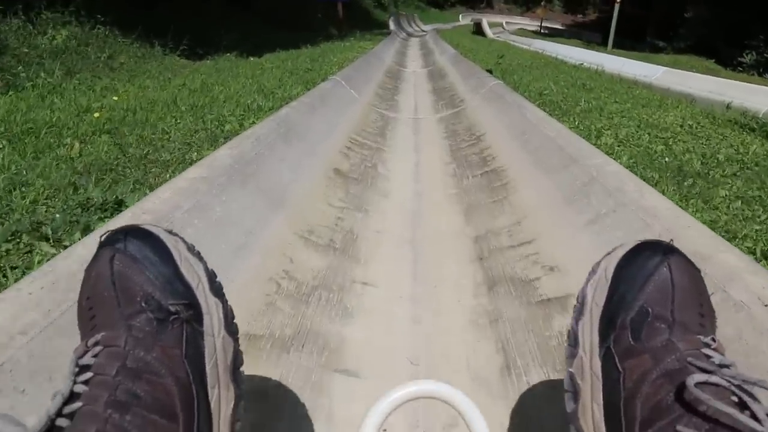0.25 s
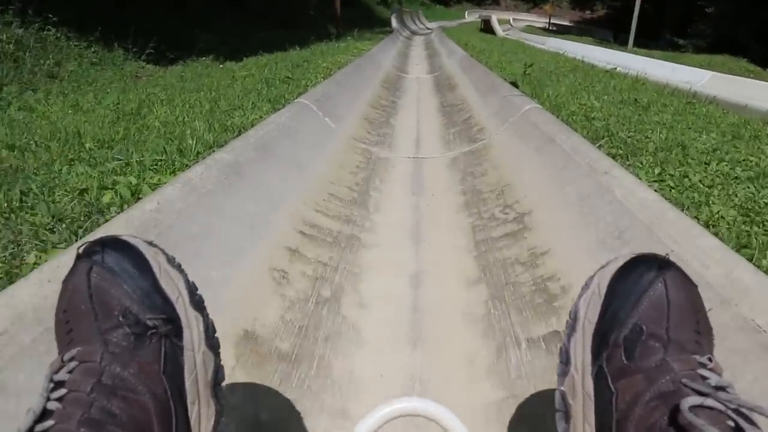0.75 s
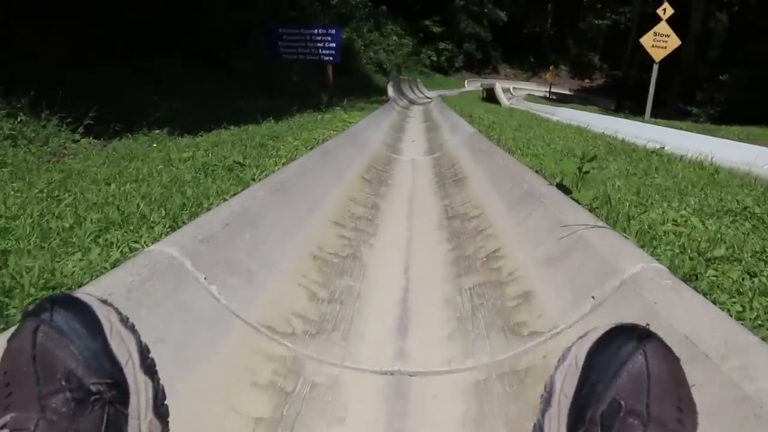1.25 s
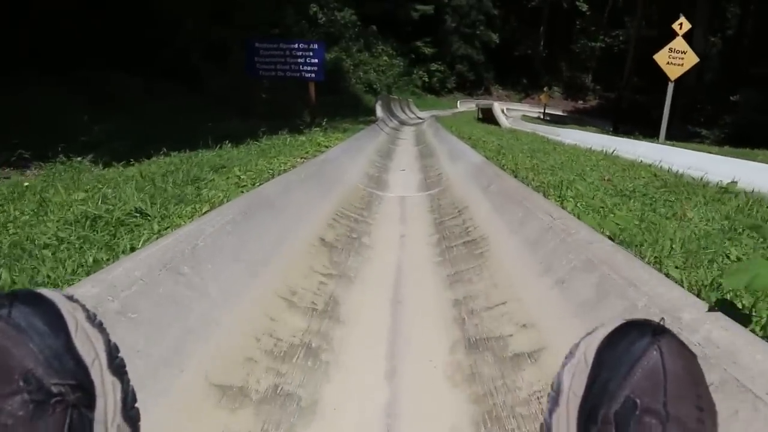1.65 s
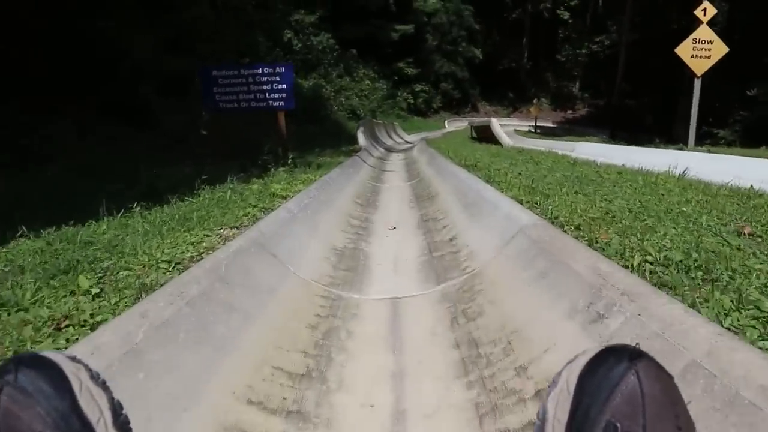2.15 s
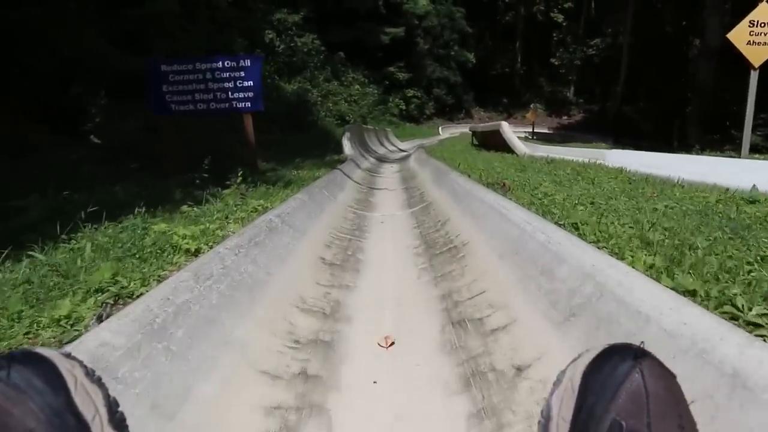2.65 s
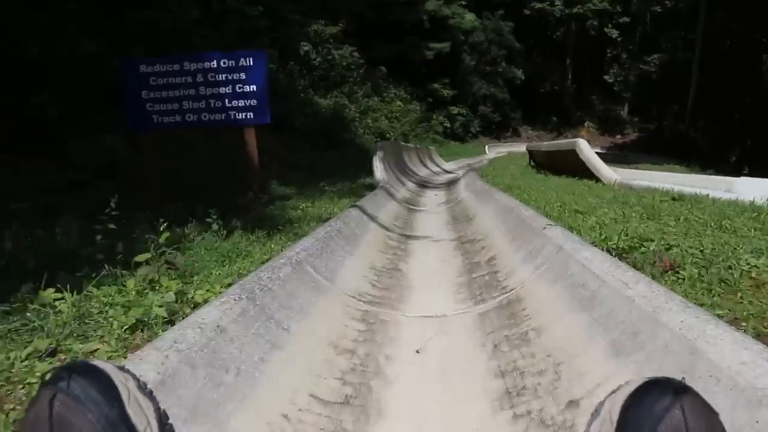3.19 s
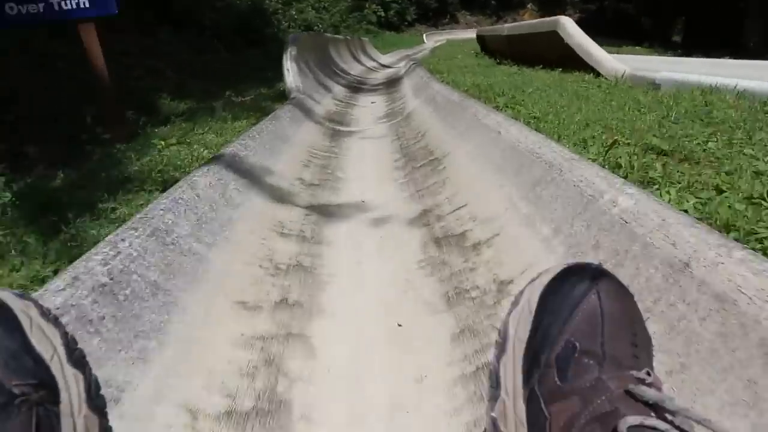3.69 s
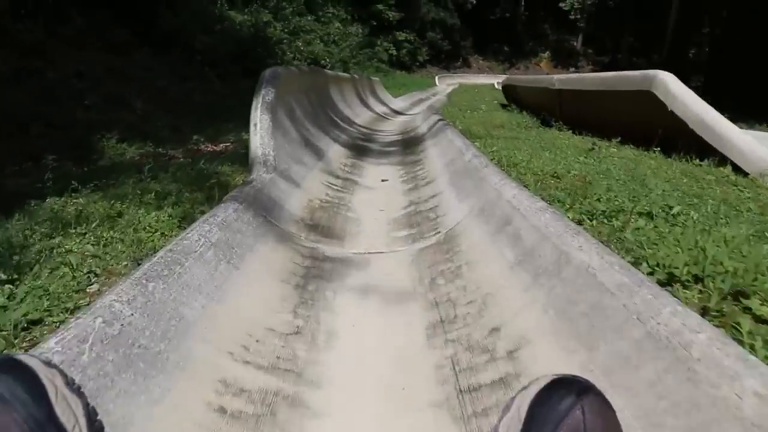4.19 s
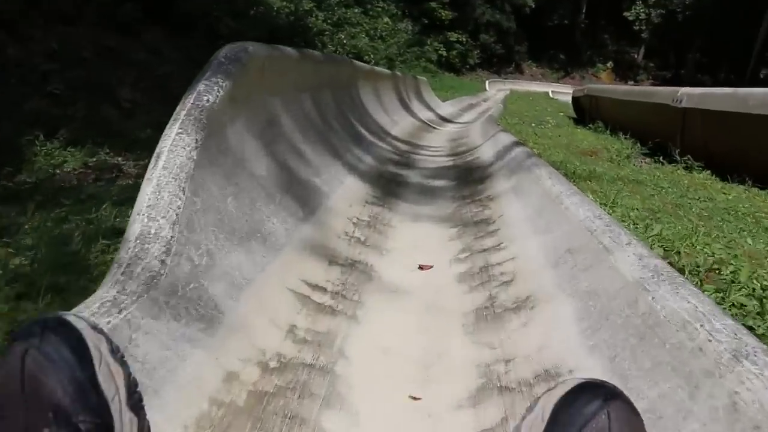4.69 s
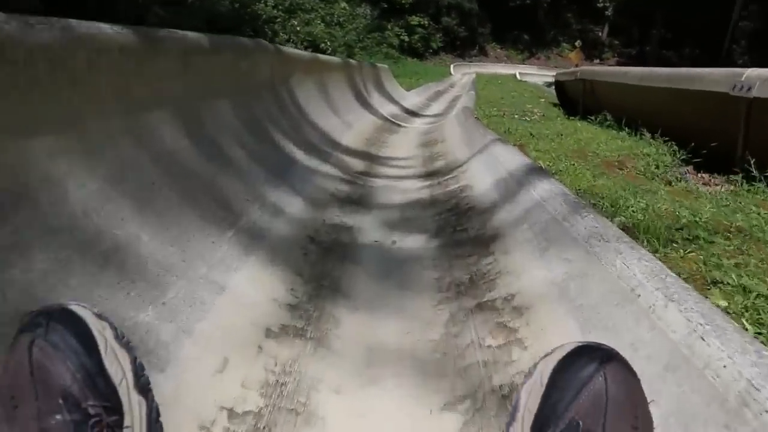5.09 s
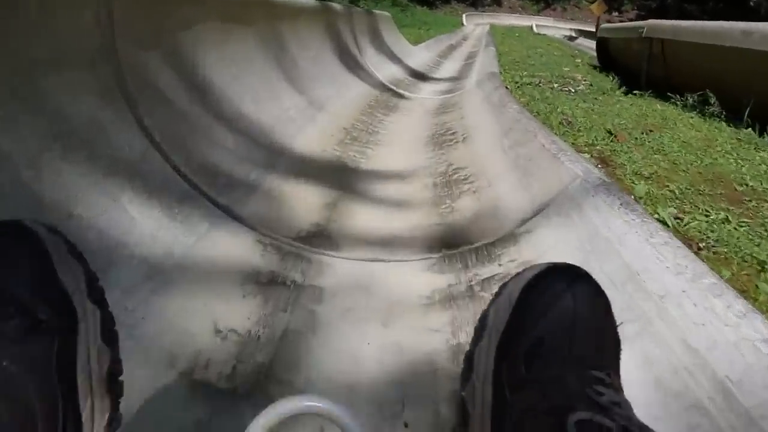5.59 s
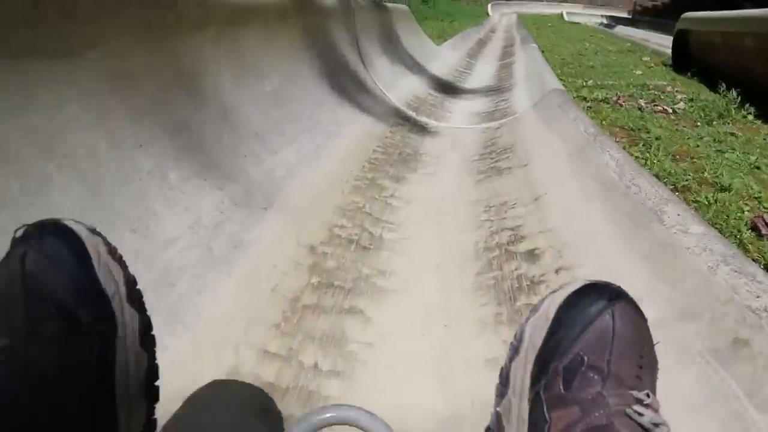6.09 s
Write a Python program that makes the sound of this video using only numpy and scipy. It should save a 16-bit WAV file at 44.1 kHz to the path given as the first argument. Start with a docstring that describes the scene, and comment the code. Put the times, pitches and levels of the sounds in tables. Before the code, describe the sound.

A small sled rolls down an outdoor concrete trough, heard from on board. Its wheels make a continuous low rumble, a midrange whirr and a sandy hiss, with brief scrubs and low wind buffeting the microphone. The sound swells over the first half second. The wheels thump hard over joints at about 0.5, 1.9, 2.8 and 3.8 seconds, each followed by smaller bounces and rattling clacks. After the hard hits the rolling dips briefly and swells back. A few bits of grit snap under the wheels, most clearly with a sharp clack at 4 seconds. From about 3 seconds the rolling gradually gets quieter, the whirr rising slightly in pitch around 3.7 seconds and then sinking. A lighter, crisper knock comes at 4.9 seconds. The sled then rolls on softly, with faint rattles and a small bump near 6.2 seconds.

```python
"""The wheels of a small sled rumble, whirr and hiss down a concrete trough, the microphone riding along.
The grain of the track drives the resonances of shell and wheels; sideways slips ring briefly by friction.
About once a second the wheels slam over a joint, and the sled bounces and rattles after it.
Grit snaps under the treads and wind buffets the microphone. Hard slams push an automatic gain control
down, and the rolling swells back."""
import sys
import numpy as np
from scipy import signal
from scipy.fft import rfft, irfft, next_fast_len
from scipy.io import wavfile
from scipy.ndimage import map_coordinates

SR = 44100
rng = np.random.default_rng(int(sys.argv[2]) if len(sys.argv) > 2 else 0)


def wrap_up_sound(samples):
    """Save the sound to the file named by the first command line argument, as 16-bit audio."""
    columns = np.atleast_2d(samples).T
    # keep every value between -1 and 1, then stretch to whole-number steps
    tamed = np.clip(columns, -1, 1)
    steps = np.round(tamed * 32767).astype(np.int16)
    wavfile.write(sys.argv[1], SR, steps)


N = 279884

# Resonances of the shell, wheels (before their pitch glide) and chassis:
# (frequency [Hz], bandwidth [Hz], relative level [dB])
SHELL_MODES = [(138, 199, 1.5), (220, 164, -9), (314, 133, -1.5)]
WHEEL_MODES = [(517.6, 258, 1.5), (665, 96, 1), (783, 275, -3.5), (910, 465, -8.5), (1260, 210, -12),
               (1580, 190, -23)]
CHASSIS_MODES = [(148, 16, -12.5), (240, 37, 9), (384, 110, 5.5), (562, 200, 5), (680, 200, 9),
                 (1008, 390, -2.5), (1370, 140, -8), (1570, 170, -19), (2250, 500, -25)]
# The whirr rings higher as the sled runs into the bend: (time [s], pitch [ratio])
WHIRR_GLIDE = [(0, 0.88), (.45, 0.99), (1, 1), (1.799, 1.074), (2.45, 1.03), (3.1, 1.02), (3.7, 1.12),
               (4.801, 1.026), (5.3, 1), (6.35, 0.95)]
# How hard the sled runs, from its speed and the roughness of the track: (time [s], level [dB])
PACE = [(0, 0.5), (.27, 2), (.55, 4), (.9, 1), (1.3, 2.5), (1.68, 4.5), (1.86, 1.4), (2.1, 1),
        (2.75, -0.23), (3.15, -4), (3.75, -5), (4.35, -8.5), (5.1, -14.5), (5.75, -14), (6.15, -11),
        (6.35, -10.5)]
# Coarse stretches of track: (time [s], half-width [s], whirr gain [dB], hiss gain [dB])
ROUGH_PATCHES = [(0.188, 0.023, 6.5, 3), (0.406, 0.18, 1.5, 1), (1.12, 0.17, 1.5, 3.5),
                 (1.47, .1, -1.5, -0.5), (1.8, 0.06, 1.5, -8), (1.88, 0.029, 3, -1),
                 (2.446, 0.058, 5, -2.5), (2.68, 0.047, 3.5, 1), (3.252, 0.078, 1, 3), (3.497, 0.027, 7, 4),
                 (3.706, 0.13, 4.5, 2), (4.27, 0.043, 8, -1.5), (4.469, 0.069, 5.5, 2), (4.76, 0.068, 8, 1),
                 (5.35, 0.13, 2.5, -2), (5.557, 0.014, 8.5, -6), (5.967, 0.096, 2, 0.5)]
# A joint throws the wheels up, and the rolling lulls or lifts: (time [s], half-width [s], gain [dB])
HOPS = [(1.962, 0.025, -8.5), (3.968, 0.0076, 3)]
# Wheels strike a joint:
# (time [s], thump level [dB], thump frequency [Hz], shudder re thump [dB], hardness [dB])
SLAMS = [(0.4601, 12.5, 226.5, -8.5, -13.5), (1.8919, 13.5, 172, -7.5, -32), (2.8164, 14.5, 170, -13, -5.5),
         (3.8333, 14.5, 170.3, -21, -20), (4.9075, 6, 167.5, -8.5, 10), (6.152, -11.5, 197, -27, 2)]
# The sled drops on its tyres: (time [s], thump level [dB], thump frequency [Hz], shudder re thump [dB])
BOUNCES = [(0.462, 3.5, 80.4, -17), (0.476, -15, 126, -4), (.767, -5, 248, 1.5), (0.772, -11, 73, 10.5),
           (0.779, -3.5, 208, -3), (1.732, -3, 178, -17), (2.009, -5, 192, -1.5), (2.088, -0.5, 152, -9),
           (2.1, -8.5, 127, -5), (2.958, 5.5, 277, -7.5), (2.978, -2, 266, -3.5), (3.131, -7.5, 160, 0),
           (3.264, -8.5, 148, -3.5), (3.978, 0, 178, -15), (3.992, 7, 255, -14.5), (4.154, -7.5, 147, -2.5),
           (4.911, 4.5, 376, -15), (5.264, -23, 177, 3.5)]
# Sharp ringing clacks, as loose parts rattle and the hardest slams crack:
# (time [s], tick level [dB], clack re tick [dB], ring frequency [Hz], ring level [dB])
SHARP_CLACKS = [(.644, -23.5, 28, 1332, 2), (.647, -26.5, 21, 755, 4), (.707, -22, 18, 905, -23),
                (.716, -31.5, -4, 2209, -21), (1.863, -24, 5, 3770, -29), (2.008, -19, 15.5, 1412, -7),
                (2.016, -40, 3, 3630, -18), (2.942, -30, 8, 1390, -20), (2.963, -23, 11, 2950, -42),
                (3.833, -16, -3, 1440, -7.5), (3.993, -8.5, -3, 2400, -23), (4.081, -19.5, 12, 1050, -7),
                (4.909, -31, -0.5, 2550, -13), (4.912, -32, 2, 1200, -7), (5.088, -27, 4, 1680, -21.5),
                (5.182, -34, 8, 2424, -49.5), (5.602, -40, 11, 2507, -46), (6.155, -33, 9.5, 750, -18),
                (6.236, -38.5, 14, 2420, -34.5)]
# Brief ringing swells, as wheels scrub sideways and, near the end, the shell hums low:
# (time [s], half-width [s], frequency [Hz], level [dB])
RINGING_SWELLS = [(0.341, 0.45, 618, -20.5), (.397, 0.036, 10150, -57), (0.551, .007, 700, -20.5),
                  (1.024, 0.014, 715, -20), (1.072, 0.0073, 723, -12), (1.237, 0.029, 797, -23.5),
                  (1.302, 0.0095, 795, -20), (1.323, 0.032, 750, -23), (1.463, 0.014, 697, -17.5),
                  (1.559, 0.026, 784, -16.5), (1.623, 0.009, 615, -17), (1.666, 0.007, 586, -16),
                  (1.728, 0.01, 818, -13.5), (1.81, 0.041, 714, -24.5), (2.161, 0.0085, 814, -17),
                  (2.248, 0.011, 800, -26.5), (2.356, 0.0042, 650, -26.5), (2.421, .008, 1170, -27),
                  (2.456, 0.011, 910, -20.5), (2.504, 0.029, 1210, -31.5), (2.621, .006, 810, -17),
                  (2.693, 0.007, 794, -20.5), (2.8, 0.015, 1010, -24.5), (3.466, 0.0095, 1050, -27.5),
                  (3.5, 0.024, 820, -23.5), (3.732, 0.0064, 780, -27), (3.79, 0.057, 915, -34.5),
                  (3.931, 0.04, 1090, -26), (4.134, 0.016, 1220, -35), (4.415, .03, 890, -32.5),
                  (4.547, 0.037, 820, -27.5), (4.719, 0.052, 854, -34), (4.8, 0.22, 883, -35),
                  (4.8, .12, 1270, -45.5), (5.551, 0.011, 890, -38.5), (5.714, 0.0087, 675, -32.5),
                  (5.768, 0.018, 676, -31.5), (5.888, 0.038, 680, -36), (6.125, 0.0053, 814, -31.5),
                  (6.156, 0.075, 217, -29.5)]
# Grains pinched under a wheel: (time [s], frequency [Hz], bandwidth [Hz], level [dB])
GRIT = [(.645, 4400, 3000, -28), (2.607, 6070, 1200, -30.5), (2.963, 5500, 6000, -35),
        (3.688, 4360, 600, -29), (3.835, 4830, 3000, -22.5), (3.917, 4800, 2002, -48),
        (3.995, 4600, 4500, -18), (3.996, 15300, 1200, -37), (4.044, 5700, 2500, -38)]
# Spectra of tread hiss, contact tick, shell shudder and wind: (frequency [Hz], relative level [dB])
HISS_SPECTRUM = [(900, -26), (1500, 11), (2000, 5.5), (3000, -3), (4000, -5.5), (5500, -10.5), (7000, -16),
                 (9000, -31.5), (12000, -35), (15000, -54.5)]
TICK_SPECTRUM = [(600, -3.5), (1350, 13), (1900, 5.5), (2600, 2), (4200, -10.5), (6500, -20), (9000, -39.5),
                 (15000, -58.5)]
SHUDDER_SPECTRUM = [(20, -11), (60, -3), (100, -2.5), (150, 3.5), (255, 0.5), (400, -8), (700, -25.5),
                    (2000, -89), (8000, -110)]
WIND_SPECTRUM = [(12, -27), (25, -12.5), (45, -0.5), (70, -4.5), (100, -2), (160, -15.5), (400, -29.5),
                 (1500, -68.5), (8000, -110)]
# Stereo width: (frequency [Hz], side re mid [dB])
STEREO_WIDTH = [(40, -27), (90, -15), (170, -22.5), (330, -27), (480, -13.5), (640, -10), (850, -12.5),
                (1400, -6), (2400, 0.5), (4400, 5.5), (8000, 11.5), (15000, 14.5)]
# Stereo balance: (frequency [Hz], left re right [dB])
STEREO_BALANCE = [(300, 0.5), (600, 1.04), (1100, 1.4), (2000, -1.7), (5000, 0.48)]


def rolling(modes, flutter_db, flutter_hz, judder_db, judder_hz):
    """Forced vibration: track grain drives each mode, swelling on rough patches, juddering on skips."""
    patches = drift(flutter_hz)
    judder = from_db(judder_db * drift(judder_hz))
    vibration = np.zeros((2, N))
    for hz, width, db in modes:
        gain = from_db(db + flutter_db * (patches + drift(flutter_hz)))
        vibration += gain * resonate(judder * rng.standard_normal((2, N)), hz, width)
    return rms_one(stereo(muffle(vibration)))


def shell_rumble():
    """Structure-borne sound: rolling excites the low, broad modes of the shell."""
    rumble = rolling(SHELL_MODES, flutter_db=1.5, flutter_hz=6, judder_db=-0.3, judder_hz=120)
    return paced(-25, pace_slope=1.115, shaken_db=3.5, track_db=swells(HOPS)) * rumble


def wheel_whirr():
    """Modal resonance: the wheels ring under the rolling force, gliding higher in the bend."""
    coarse_db = swells((s, length, db) for s, length, db, _ in ROUGH_PATCHES)
    whirr = rolling(WHEEL_MODES, flutter_db=1.9, flutter_hz=23.6, judder_db=1.7, judder_hz=85)
    gain = paced(-27.5, pace_slope=1, shaken_db=3.5, track_db=swells(HOPS) + coarse_db)
    return gain * glide(whirr, WHIRR_GLIDE)


def tread_hiss(grain_db=0.6, flutter_db=1.74):
    """Amplitude-modulated noise: fine sand crunches unevenly under the treads."""
    sandy_db = swells((s, length, db) for s, length, _, db in ROUGH_PATCHES)
    sand = rng.standard_normal((2, N)) * from_db(grain_db * drift(300) + flutter_db * drift(17))
    hiss = rms_one(stereo(colour(sand, HISS_SPECTRUM)))
    return paced(-42, pace_slope=1.11, track_db=swells(HOPS) + sandy_db) * hiss


def knocks(relative_width=0.58, cushion_s=0.00016, shudder_s=0.024, tick_s=0.0019, lag_s=0.0014):
    """Impact excitation: at each blow the contact ticks, the chassis clacks, the shell thumps, shudders."""
    out, t = np.zeros((2, N)), np.arange(8192) / SR
    push = t * np.exp(-t / cushion_s)  # the tyres cushion the load
    for s, thump_db, thump_hz, shudder_db, clack_db, tick_db in contacts():
        shake, chatter, crunch = rng.standard_normal((3, 2, len(t)))
        thump = resonate(push, thump_hz, relative_width * thump_hz)
        shudder = stereo(colour(shake * np.exp(-t / shudder_s), SHUDDER_SPECTRUM))
        clack = chassis_clack(chatter, t)
        tick = stereo(colour(crunch * t * np.exp(-t / tick_s), TICK_SPECTRUM))
        add(out, s, from_db(clack_db) * peak_one(clack) + from_db(tick_db) * peak_one(tick))
        # the heavy shell answers a moment after the contact
        add(out, s + lag_s, from_db(thump_db) * peak_one(thump) + from_db(shudder_db) * peak_one(shudder))
    return out


def contacts():
    """Contact hardness: a harder blow puts more of its energy into the bright clack and tick."""
    # (time [s], thump level [dB], thump frequency [Hz], shudder [dB], clack [dB], tick [dB])
    slams = [(s, db, hz, db + shudder, db - 11 + 0.18 * hardness, db - 34 + hardness)
             for s, db, hz, shudder, hardness in SLAMS]
    bounces = [(s, db, hz, db + shudder, db - 15, db - 34) for s, db, hz, shudder in BOUNCES]
    clacks = [(s, db + 5.5, 203, db - 6.5, db + clack, db) for s, db, clack, *_ in SHARP_CLACKS]
    return slams + bounces + clacks


def chassis_clack(chatter, t, chatter_db=-14, chatter_s=0.0086, detune=0.05, scatter_db=1.5):
    """Modal superposition: a blow and the brief chatter of loose parts ring the chassis modes."""
    blow = signal.unit_impulse(len(t)) * [[1], [0]]  # mid channel only
    force = muffle(blow + from_db(chatter_db) * chatter * np.exp(-t / chatter_s), cutoff_hz=3820)
    # each blow lands on another spot, so the resonances shift and take other shares
    spots = rng.uniform(-1, 1, (len(CHASSIS_MODES), 2))
    return stereo(sum(from_db(db + scatter_db * share) * resonate(force, hz * (1 + detune * shift), width)
                      for (hz, width, db), (shift, share) in zip(CHASSIS_MODES, spots)))


def ringing_swells(relative_width=0.32, steadiness=0.91):
    """Narrow-band resonance: slipping wheels ring briefly by friction; near the end the shell hums low."""
    out, t = np.zeros((2, N)), np.arange(SR // 2) / SR
    soft_ends = signal.windows.tukey(len(t), 0.25)
    for s, half_width, hz, db in RINGING_SWELLS + slips():
        swell = np.exp(-2 * ((t - t.mean()) / half_width) ** 2) * soft_ends
        ringing = signal.hilbert(resonate(rng.standard_normal((2, len(t))), hz, relative_width * hz))
        # dividing by the envelope evens out the ringing
        held = ringing.real / (np.abs(ringing) + ringing.real.std() / 2) ** steadiness
        swell_rms = np.sqrt(np.mean(swell ** 2))
        add(out, s - t.mean(), from_db(db) * swell_rms * rms_one(muffle(swell * held)))
    return stereo(out)


def slips(per_s=6, half_width_s=0.0075, middle_hz=665, spread_octaves=0.15, base_db=-30, spread_db=3):
    """Random slip: short scrubs at chance moments, following the pace; rows as in RINGING_SWELLS."""
    gap, pitch, strength = rng.random((100, 3)).T
    times = np.cumsum(0.5 + gap) / per_s
    pitches = middle_hz * 2 ** (spread_octaves * (2 * pitch - 1))
    levels = base_db + np.interp(times, *np.transpose(PACE)) + spread_db * (2 * strength - 1)
    return [(s, half_width_s, hz, db) for s, hz, db in zip(times, pitches, levels) if s < N / SR]


def clack_rings(relative_width=0.21):
    """Damped vibration: each rattle of a loose part or crack of a slam rings briefly at its own pitch."""
    out = np.zeros((2, N))
    for s, _, _, hz, db in SHARP_CLACKS:
        add(out, s, from_db(db) * snap(hz, relative_width * hz, decay_s=0.0019))
    return muffle(out)


def grit():
    """Brittle fracture: a pinched grain cracks with a short bright snap."""
    out = np.zeros((2, N))
    for s, hz, width, db in GRIT:
        add(out, s, from_db(db) * snap(hz, width, decay_s=0.0025))
    return out


def wind(gust_db=3, gust_hz=5.8):
    """Turbulent pressure: eddies press on the microphone in low lumps."""
    eddies = stereo(colour(rng.standard_normal((2, N)), WIND_SPECTRUM))
    gusts = from_db(gust_db * drift(gust_hz))
    return paced(-35, pace_slope=0.98, shaken_db=4) * rms_one(eddies * gusts)


def paced(base_db, pace_slope, shaken_db=0, track_db=0, rise_s=0.011, settle_s=0.55):
    """Gain envelope: it follows pace and track, and the shaking after each slam decays exponentially."""
    t = np.arange(N) / SR
    strongest_db = max(slam[1] for slam in SLAMS)
    shaking = np.zeros(N)
    for s, db, *_ in SLAMS:
        onset = np.clip((t - s) / rise_s, 0, 1)
        shaking += from_db(db - strongest_db) * onset * np.exp(-np.abs(t - s) / settle_s)
    pace_db = np.interp(t, *np.transpose(PACE))
    return from_db(base_db + pace_slope * pace_db + shaken_db * shaking + track_db)


def swells(rows):
    """Sum of Gaussian rises and dips, from rows of (time [s], half-width [s], gain [dB])."""
    t = np.arange(N) / SR
    return sum(db * np.exp(-((t - s) / half_width) ** 2) for s, half_width, db in rows)


def snap(hz, width, decay_s, size=2048):
    """Transient response: a very short crunch rings one resonance; unit peak."""
    crunch = rng.standard_normal((2, size)) * np.exp(-np.arange(size) / SR / decay_s)
    return peak_one(stereo(resonate(crunch, hz, width)))


def resonate(x, hz, width):
    """Two equal resonators in cascade: the response swells, rings out and has steep skirts."""
    r = np.exp(-np.pi * width / SR)
    section = [(1 - r * r) / 2, 0, (r * r - 1) / 2, 1, -2 * r * np.cos(2 * np.pi * hz / SR), r * r]
    return signal.sosfilt([section, section], x)


def muffle(x, cutoff_hz=4200):
    """Vibration isolation: soft tyres and mounts act as a low-pass filter."""
    return signal.sosfilt(signal.butter(2, cutoff_hz, fs=SR, output="sos"), x)


def glide(pair, curve):
    """Variable-rate resampling shifts the pitch along a curve of (time [s], pitch [ratio])."""
    position = np.cumsum(np.interp(np.arange(N) / SR, *np.transpose(curve)))
    return np.array([map_coordinates(x, [position], order=3, mode="mirror") for x in pair])


def stereo(pair):
    """Mid-side mixing: two unrelated signals become left and right, bass central and treble wide."""
    mid, side = pair[0], colour(pair[1], STEREO_WIDTH)
    return np.array([colour(mid + side, STEREO_BALANCE, 0.5), colour(mid - side, STEREO_BALANCE, -0.5)])


def colour(x, points, share=1):
    """Minimum-phase filter through (frequency [Hz], level [dB]), the levels scaled by share."""
    size = 2 * next_fast_len(x.shape[-1] // 2 + 1024)
    hz, db = np.transpose(points)
    log_hz = np.log(np.fft.rfftfreq(size, 1 / SR) + 1)
    log_gain = np.interp(log_hz, np.log(hz), np.log(from_db(share * db)))
    causal_cepstrum = irfft(log_gain) * (1 + np.sign(np.fft.fftfreq(size)))
    return irfft(rfft(x, size) * np.exp(rfft(causal_cepstrum)))[..., :x.shape[-1]]


def drift(corner_hz, step=40, warm_up=2000):
    """Low-passed noise: a slow random fluctuation of unit power."""
    r = np.exp(-2 * np.pi * corner_hz * step / SR)
    noise = rng.standard_normal(N // step + warm_up + 2)
    slow = signal.lfilter([1], [1, -2 * r, r * r], noise)[warm_up:]
    return np.interp(np.arange(N) / step, np.arange(len(slow)), rms_one(slow))


def add(out, s, sound):
    """Superpose a sound, starting at s seconds."""
    start = round(s * SR)
    out[:, max(start, 0):start + sound.shape[-1]] += sound[..., max(-start, 0):N - start]


def from_db(db):
    """Decibels to amplitude ratio."""
    return 10 ** (np.asarray(db) / 20)


def rms_one(x):
    """Normalise to unit power."""
    return x / np.sqrt(np.mean(x ** 2) + 1e-20)


def peak_one(x):
    """Normalise to unit peak."""
    return x / (np.abs(x).max() + 1e-20)


def gain_control(x, threshold_db, release_db_per_s, attack_s, ahead_s, start_cut_db):
    """Peak limiting: peaks over the threshold pull the gain down; it climbs back at a steady rate."""
    t = np.arange(N) / SR
    excess_db = np.maximum(20 * np.log10(np.abs(x).max(axis=0) + 1e-9) - threshold_db, 0)
    release_db = release_db_per_s * t
    cut_db = np.maximum.accumulate(np.maximum(excess_db + release_db, start_cut_db)) - release_db
    r = np.exp(-1 / (attack_s * SR))
    smooth_cut_db = signal.lfilter([1 - r], [1, -r], cut_db)
    return x * from_db(-np.interp(t + ahead_s, t, smooth_cut_db))


def scene():
    """Superposition: three layers of rolling, with knocks, ringing clacks, grit, wind and ringing swells."""
    wheels = shell_rumble() + wheel_whirr() + tread_hiss()
    return wheels + knocks() + clack_rings() + grit() + wind() + ringing_swells()


def record(dry, cutoff_hz=16200):
    """Compression and saturation: gain control, soft clipping of the hardest slams, a steep low-pass."""
    held = gain_control(dry, threshold_db=1.14, release_db_per_s=13.5, attack_s=0.0019,
                        ahead_s=0.003, start_cut_db=11)
    clipped = held / (1 + held ** 8) ** (1 / 8)
    return signal.sosfilt(signal.cheby2(12, 70, cutoff_hz, fs=SR, output="sos"), clipped)


dry = scene()
out = record(dry)
wrap_up_sound(out)
```